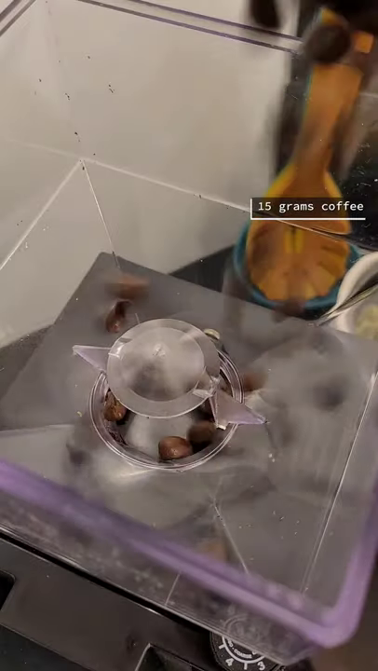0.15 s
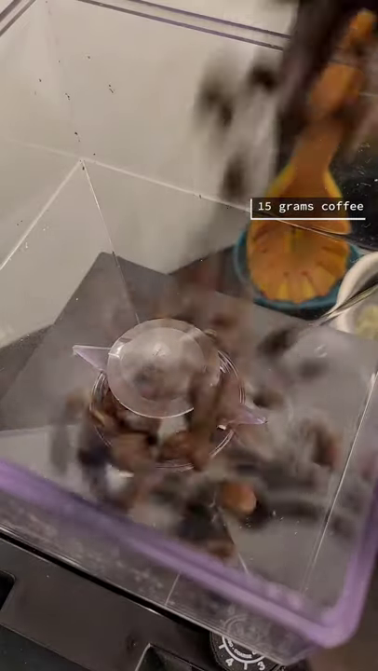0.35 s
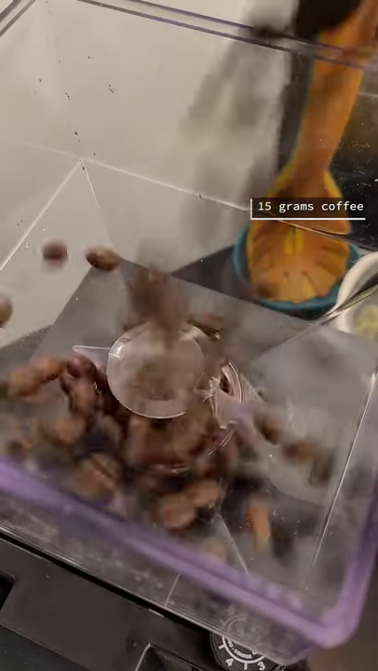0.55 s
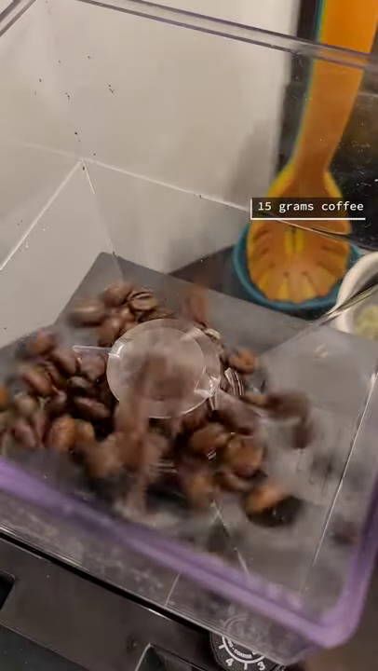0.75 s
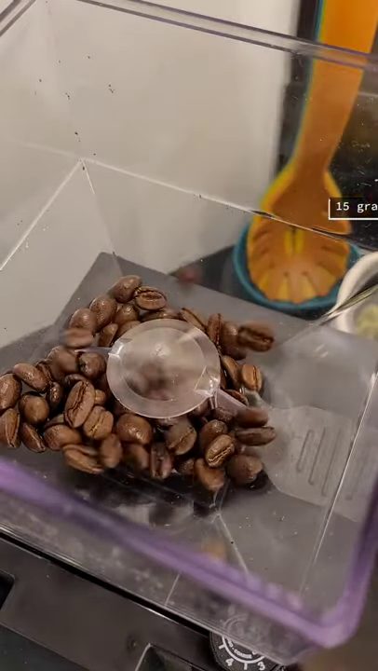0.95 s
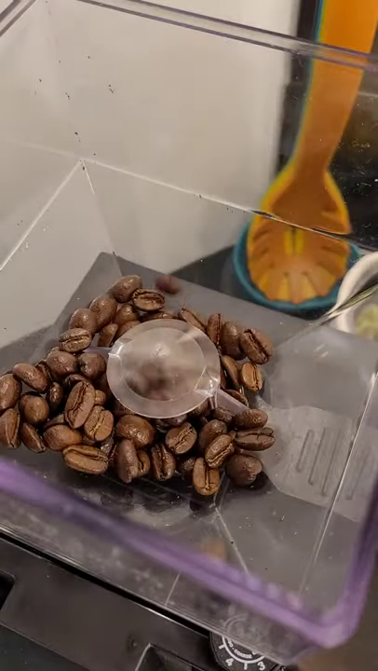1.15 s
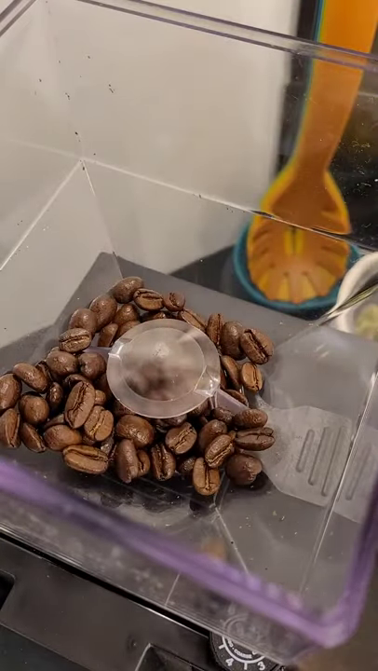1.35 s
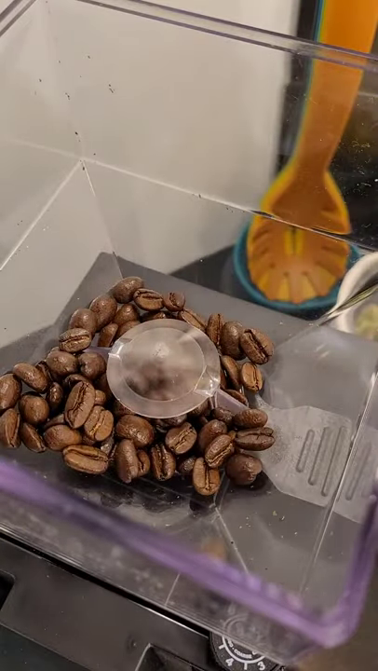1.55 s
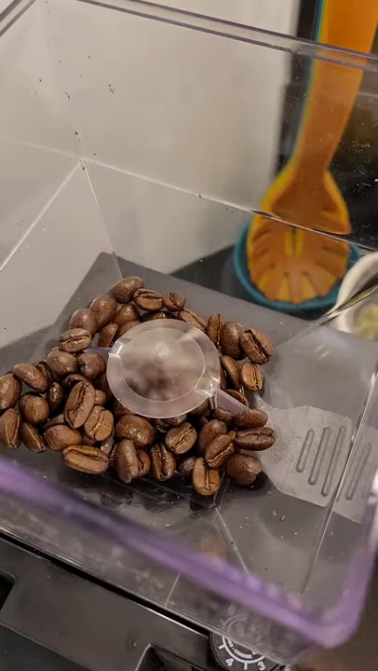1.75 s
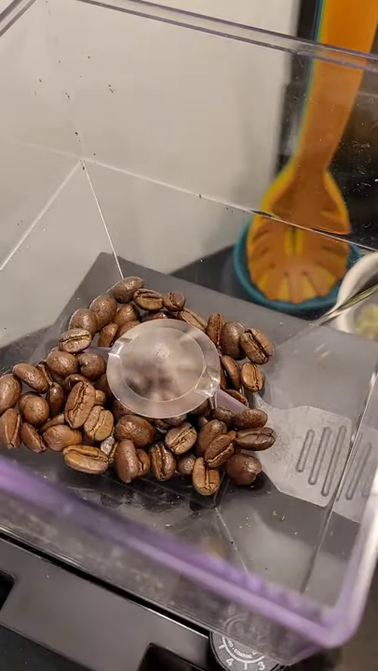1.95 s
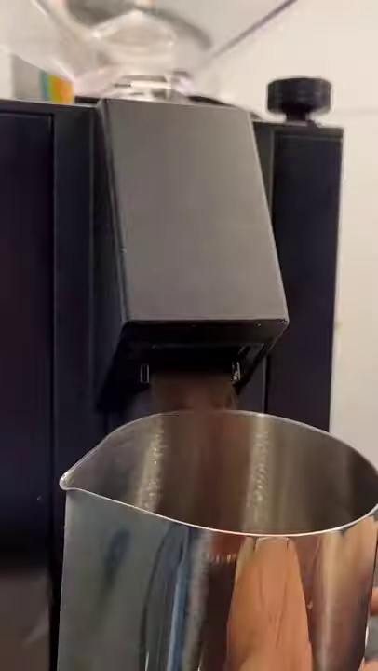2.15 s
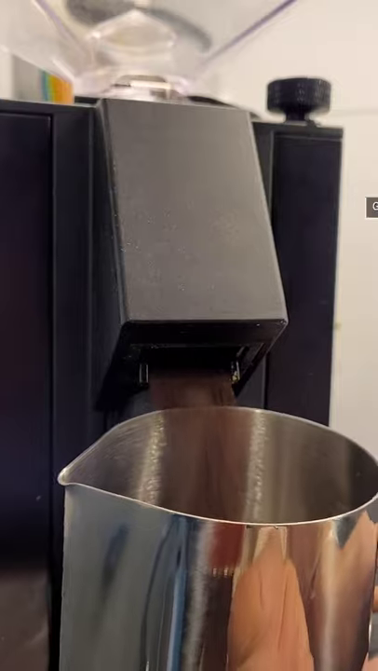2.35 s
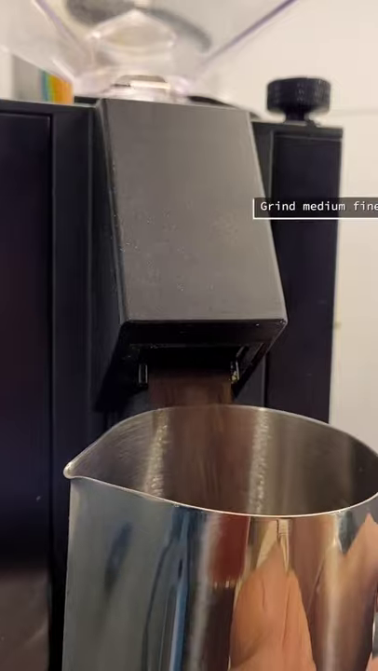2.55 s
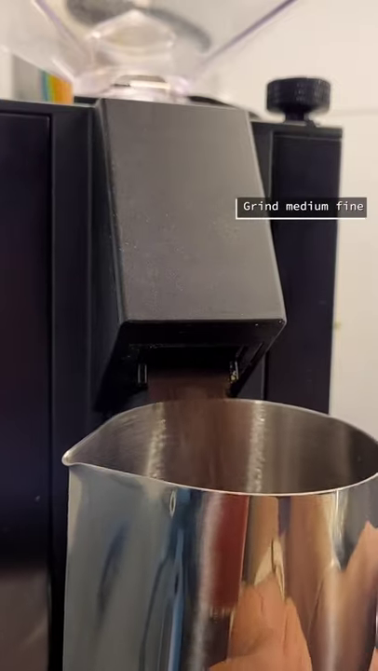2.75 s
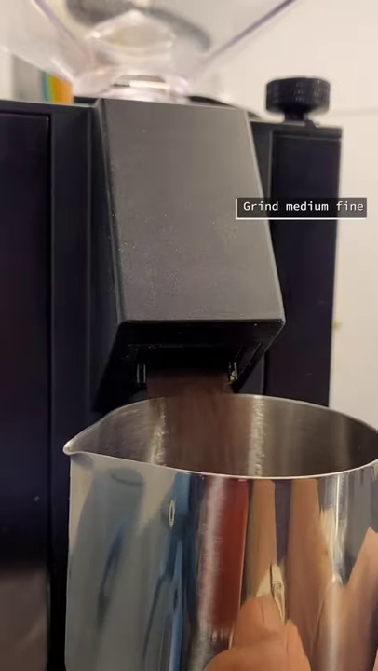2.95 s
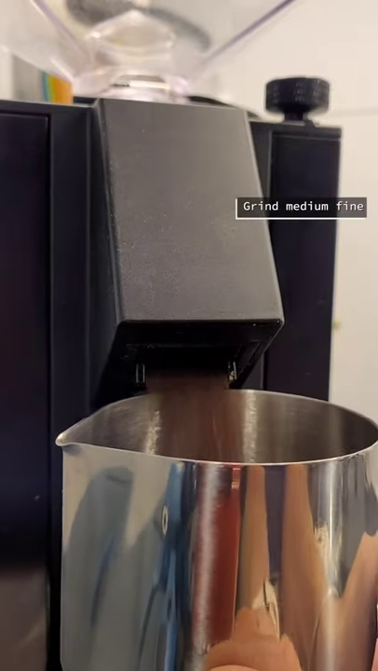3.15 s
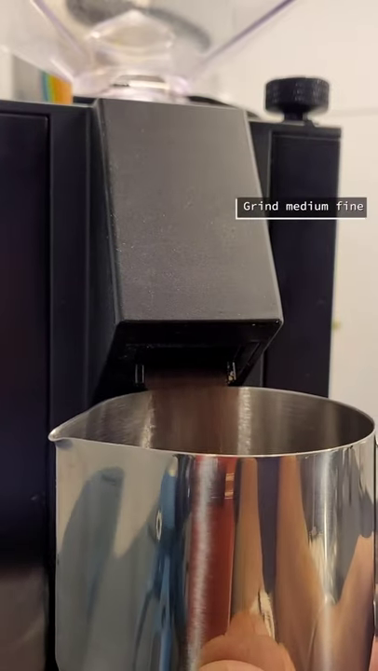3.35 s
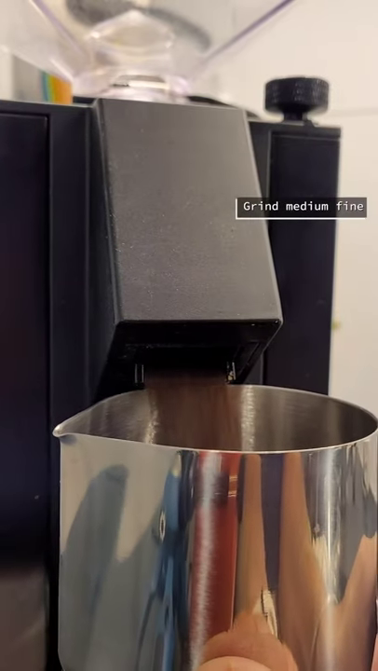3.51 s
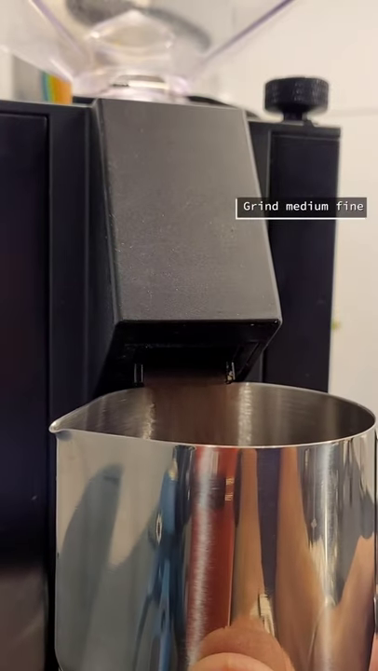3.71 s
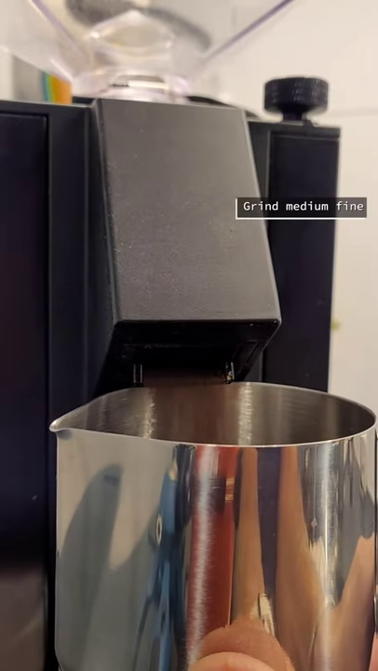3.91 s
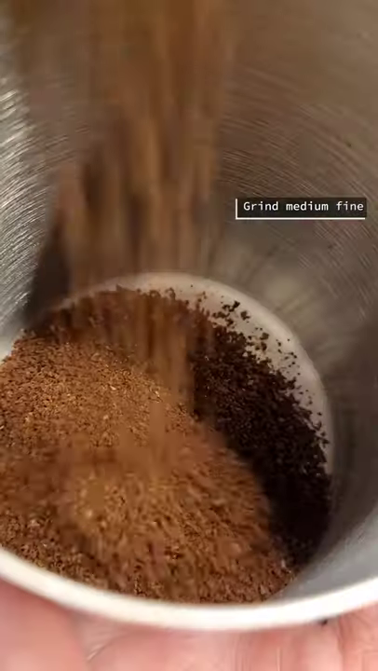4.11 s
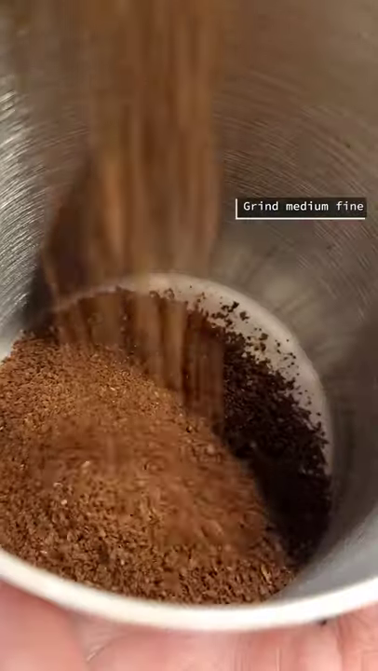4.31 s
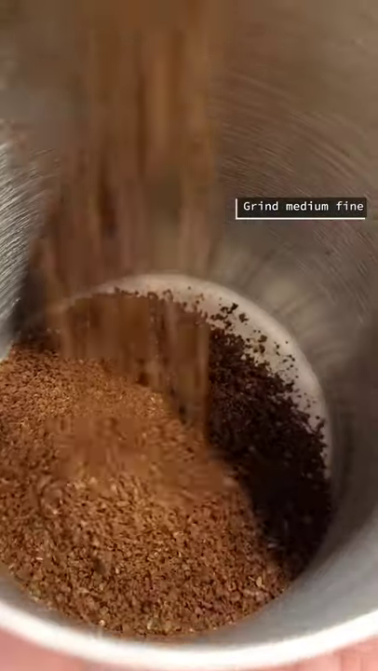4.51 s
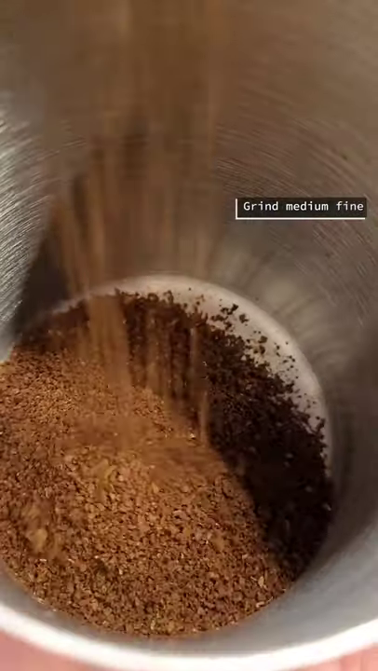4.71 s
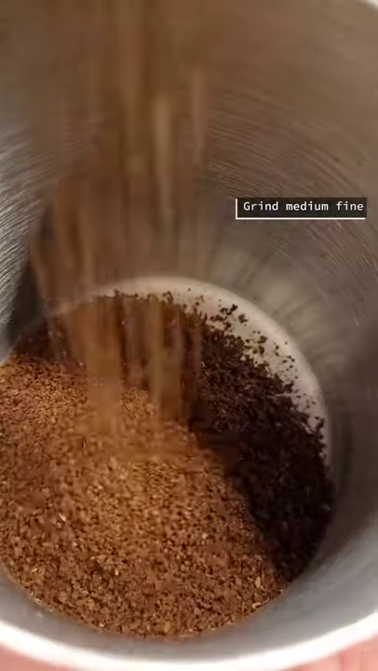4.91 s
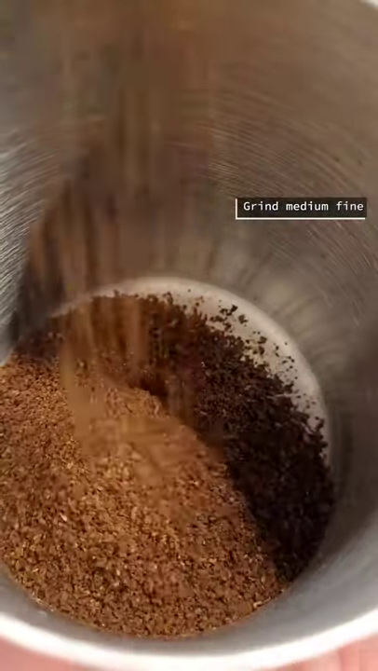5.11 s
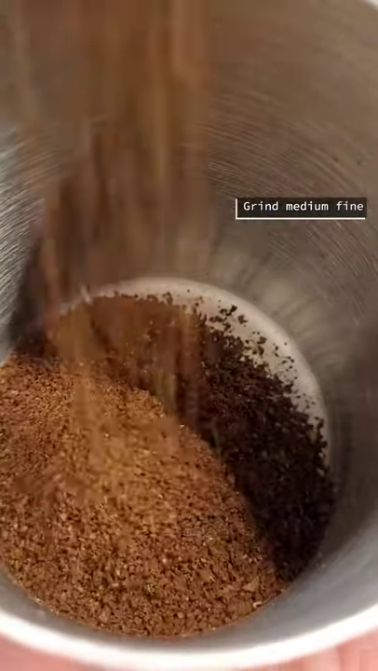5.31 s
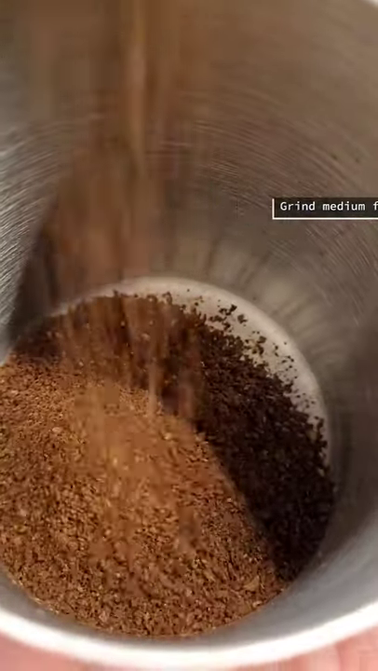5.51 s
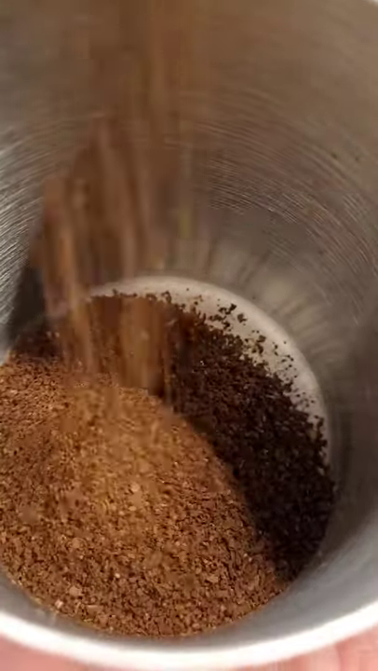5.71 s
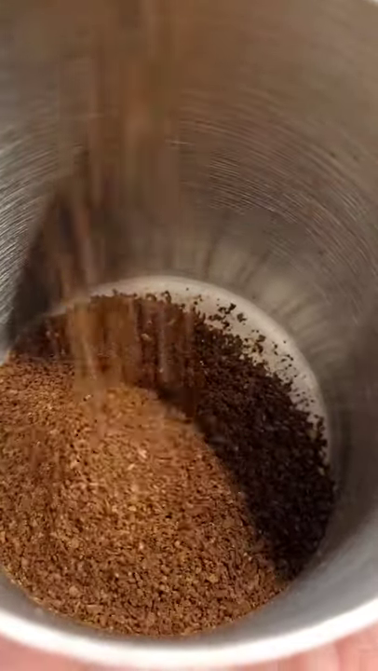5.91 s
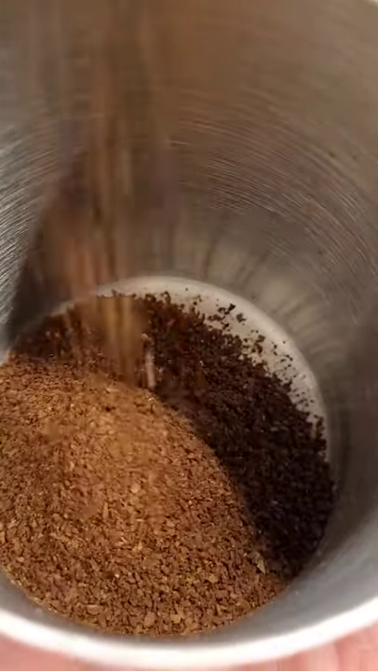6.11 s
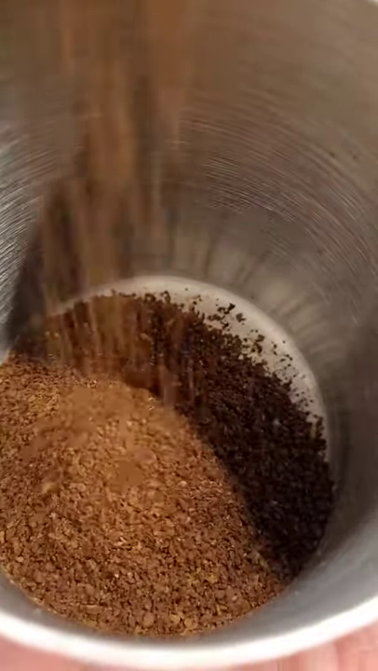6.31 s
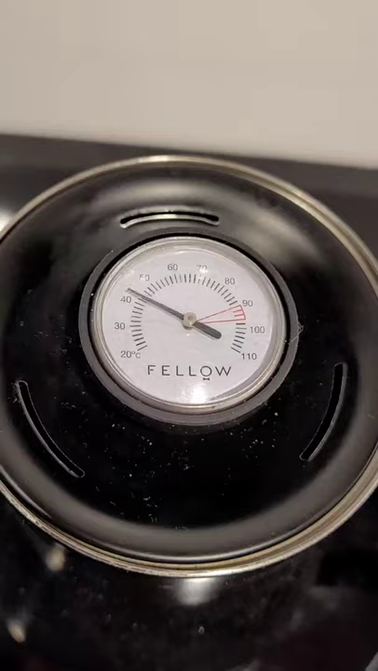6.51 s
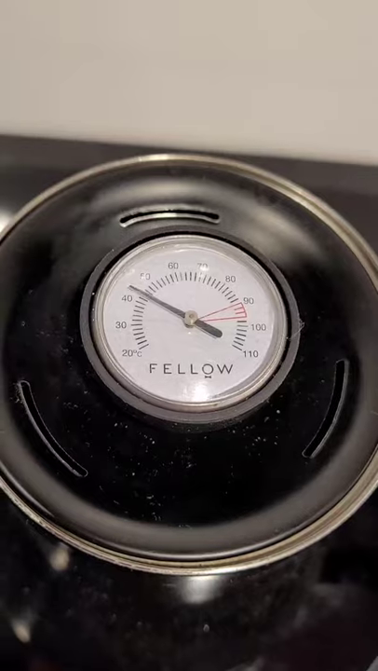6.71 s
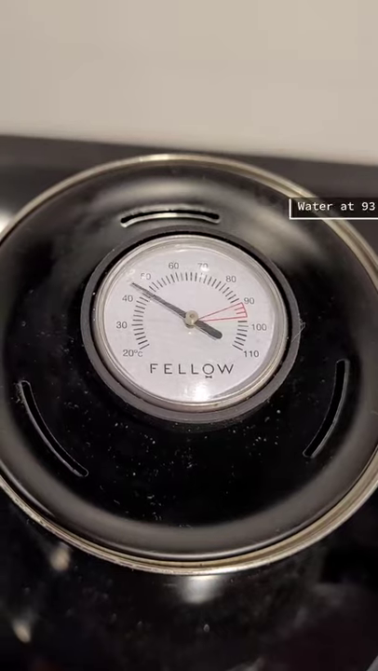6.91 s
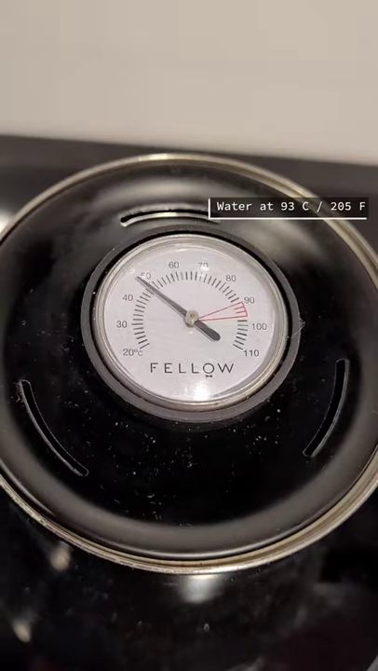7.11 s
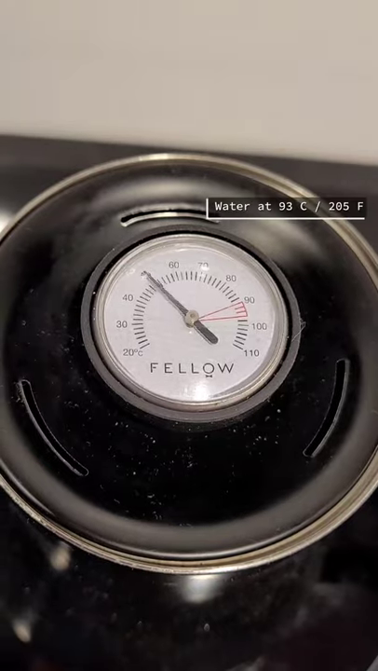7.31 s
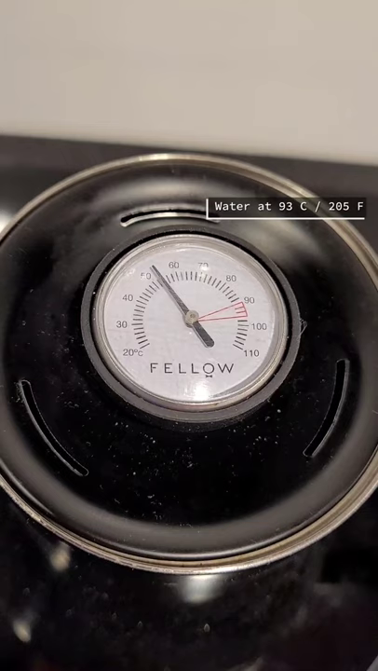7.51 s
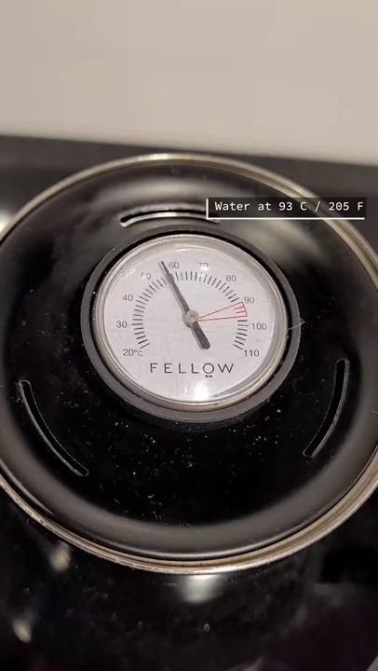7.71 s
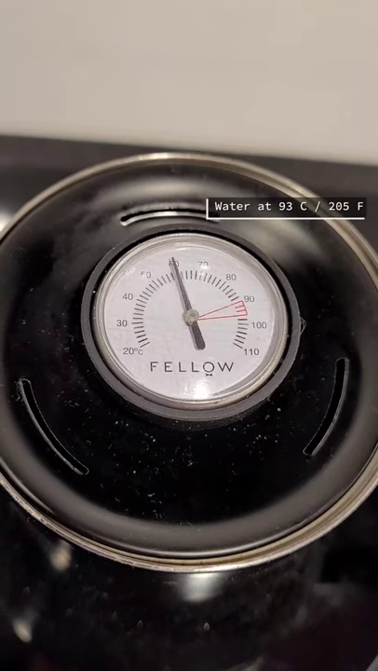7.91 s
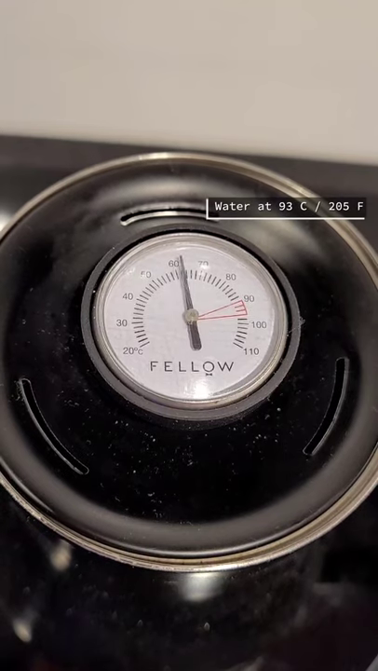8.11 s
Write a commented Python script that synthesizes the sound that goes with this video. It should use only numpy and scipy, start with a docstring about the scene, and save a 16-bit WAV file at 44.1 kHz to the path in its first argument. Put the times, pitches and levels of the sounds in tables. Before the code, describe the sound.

Three close stereo spots follow each other with hard cuts. First, dry beans rattle sharply on hollow plastic, swell and trail off into faint room rumble. Next, a coffee grinder runs with a rough low buzz and gritty crunching, then sounds more metallic over a jug as the beans run low and crack singly. Last, a much quieter kettle heats, fizzing finely over a low murmur.

```python
"""In a kitchen, making coffee, from three spots one after another: grinder hopper, grinder outlet, kettle.
Beans pour into the plastic hopper as random contacts ringing its resonances; the last few bounce to rest.
The grinder growls at its tooth rate and crunches, close to its chute, then from above the steel jug as
the beans run low. Last, water heats in a kettle: tiny steam bubbles, short rings, snap over a low simmer
of filtered noise."""
import sys
import numpy as np
from scipy import signal
from scipy.fft import rfft, irfft, next_fast_len
from scipy.io import wavfile
from scipy.ndimage import uniform_filter1d

SR = 44100
rng = np.random.default_rng(int(sys.argv[2]) if len(sys.argv) > 2 else 0)


def file_out(sig):
    """Save sig as 16-bit WAV at sys.argv[1]."""
    # one column per channel
    cols = np.atleast_2d(sig).T
    # limit, then scale
    lim = np.clip(cols, -1, 1)
    pcm = np.round(lim * 32767).astype(np.int16)
    wavfile.write(sys.argv[1], SR, pcm)


N = 359415
T = np.arange(N) / SR  # time [s]

# where the chute, the jug and the kettle begin: time [s]
CUTS = [2.092, 4.105, 6.493]


def amp(db):
    """Decibels to gain."""
    return 10 ** (np.asarray(db) / 20)


def unit(x):
    """Scales to an rms of one."""
    return x / np.sqrt(np.mean(x ** 2) + 1e-20)


def levelled(x):
    """Scales a stereo pair so that its middle has an rms of one."""
    return x / np.sqrt(np.mean(x.mean(0) ** 2) + 1e-20)


def curve(rows, axis=1):
    """One column of a table, joined by straight lines in time."""
    rows = np.array(rows)
    return np.interp(T, rows[:, 0], rows[:, axis])


def read(points, hz):
    """A spectrum, joined by straight lines over log frequency."""
    f, value = np.transpose(points)
    return np.interp(np.log(hz + 1), np.log(f + 1), value)


def add(mix, s, sound):
    """Mixes a sound in at time s."""
    part = mix[..., max(round(s * SR), 0):][..., :sound.shape[-1]]
    part += sound[..., :part.shape[-1]]


def shot(start, end):
    """One between two times, zero elsewhere, with edges softened over 100 samples."""
    inside = (T >= start) & (T < end)
    return uniform_filter1d(inside * 1., size=100)


def wander(hz):
    """Slow random motion of rms one, its spectrum a bell that falls to 1/e at the given rate."""
    f = np.arange(0, 3 * hz, SR / N)
    spectrum = rng.standard_normal((len(f), 2)) @ [1, 1j] * np.exp(-(f / hz) ** 2)
    return unit(irfft(spectrum, next_fast_len(N, True))[:N])


def clicks(per_s, spread_db):
    """A random train of clicks, many small and a few large."""
    size = amp(spread_db * np.minimum(rng.exponential(1, N), 4))
    return size * rng.choice([-1, 1], N) * (rng.random(N) < per_s / SR)


def ping(hz, cycles, size=3000):
    """A short ring of a few cycles: a collapsing bubble or a knocked wall."""
    age = np.arange(size) / SR * hz  # in cycles
    ring = np.sin(2 * np.pi * age) * age * np.exp(-age / cycles)
    return ring / abs(ring).max()


def body(spectrum, modes=(), pan=((1, 0), (2, 0)), detune=0, lag_s=0, size=8192):
    """Causal stereo response of a body; resonances shift from spot to spot, the right lags (left if negative)."""
    hz = np.fft.rfftfreq(size, 1 / SR)
    lift = 0
    for f, width, db in modes:
        f = f * (1 + detune * rng.standard_normal())
        lift = lift + (amp(db) ** 2 - 1) / (1 + (2 * (hz - f) / width) ** 2) ** 1.5
    db = read(spectrum, hz) + read(pan, hz) * np.array([[.5], [-.5]])
    # folding the cepstrum forward gives minimum phase: each resonance rings only after its strike
    cepstrum = irfft(np.log(amp(db) * np.sqrt(np.maximum(1 + lift, .1))))
    cepstrum[:, 1:size // 2] *= 2
    cepstrum[:, size // 2 + 1:] = 0
    delay = np.maximum([[-lag_s], [lag_s]], 0)
    return irfft(np.exp(rfft(cepstrum) - 2j * np.pi * hz * delay))[:, :size // 2]


def through(x, response):
    """Passes a sound through a left and right response."""
    return signal.oaconvolve(np.atleast_2d(x), response, axes=1)[:, :x.shape[-1]]


def knock(crack_s, ring_s, ring_db, near_db, tint_db=0, size=5000, count=14):
    """One hard contact of random colour: a crack, stronger on the nearer side, and scatter between close walls."""
    # the two microphones hear the bass alike and the treble less so: (frequency [Hz], likeness [0 to 1])
    likeness = [(350, 0.85), (1200, 0.32), (8000, .15)]
    t, hz = np.arange(size) / SR, np.fft.rfftfreq(size, 1 / SR)
    crack = np.exp(-t / crack_s) * amp([[near_db / 2], [-near_db / 2]])
    scatter = amp(ring_db) * np.exp(-t / ring_s)
    steps = rng.uniform(-1.03, 1, count)
    tint = unit(amp(tint_db * np.interp(np.sqrt(hz / hz[-1]), np.linspace(0, 1, count), steps)))
    alike = np.clip(read(likeness, hz), -1, 1)
    shares = np.sqrt([(1 + alike) / 2, (1 - alike) / 2])
    mid, side = rfft(rng.standard_normal((2, size))) * tint * shares
    return irfft(np.array([mid + side, mid - side]), size) * (crack + scatter)


def strikes(rows, spot, **contact):
    """Plays a table of contacts, each on a new spot of one body, the peak of its middle at the given level."""
    out = np.zeros((2, N))
    for s, db in rows:
        hit = through(knock(**contact), spot())
        add(out, s, amp(db) * hit / abs(hit.mean(0)).max())
    return out


def shower(spot, per_s, spread_db, count=12, **contact):
    """Many random contacts at several spots of one body; the busiest spot keeps changing, and the colour too."""
    roam_db, roam_hz = 2, 15  # how strongly (rms) and how fast each spot comes and goes
    total = np.zeros((2, N))
    for _ in range(count):
        train = clicks(per_s / count, spread_db) * amp(roam_db * wander(roam_hz))
        total += through(train, through(knock(**contact), spot()))
    return levelled(total)


def room(x, t60):
    """The faint diffuse tail of the kitchen: noise that dies by 60 dB in t60 seconds."""
    t = np.arange(SR // 2) / SR
    tail = rng.standard_normal((2, len(t))) * np.exp(-np.log(1000) * t / t60)
    return through(x, tail / np.linalg.norm(tail[0]))


def kitchen():
    """Low room noise, shaped from white noise and swelling with a few soft bumps."""
    # spectrum of the room air: (frequency [Hz], level [dB])
    air_colour = [(18, -29.5), (35, -13.5), (81, -22), (151, -6.5), (185, -35.5), (344, -17), (714, -42.5),
                  (6000, -64), (13200, -120)]
    # soft low bumps in the room: (time [s], half length to 1/e [s], level [dB])
    soft_bumps = [(1.024, 0.077, -57), (1.293, 0.049, -65), (1.732, 0.047, -59)]
    air_db = -71
    air = levelled(through(rng.standard_normal(N), body(air_colour)))
    swell = sum(amp(db) * np.exp(-((T - s) / width) ** 2) for s, width, db in soft_bumps)
    rumble_colour = [(40, -4.5), (120, 3.5), (220, -31.5), (900, -58)]  # (frequency [Hz], level [dB])
    rumble = levelled(through(rng.standard_normal(N), body(rumble_colour)))
    return amp(air_db) * air + swell * rumble


def pour():
    """Strength of the stream of beans: one swell as the cup tips and empties."""
    peak_s, peak_db, swell_s, ebb_s, flatness = 0.66, -21.5, 0.66, 0.24, 2.13
    width = np.where(T < peak_s, swell_s, ebb_s)
    return amp(peak_db) * np.exp(-abs((T - peak_s) / width) ** flatness)


def beans():
    """Beans crack against the plastic and each other; the hopper rings, knocks and thumps."""
    # beans that stand out, and the last ones bouncing, before the pile dulls their lows: (time [s], peak level [dB])
    lone_beans = [(0.0054, -7.5), (0.0662, -18), (0.0787, -11), (0.0977, -10.5), (0.1371, -8), (0.161, -24),
                  (0.1825, -10.5), (0.2254, -12), (0.2359, -9), (0.2598, -8), (0.2962, -14.5),
                  (0.3277, -22), (0.3745, -8.5), (0.4179, -13.5), (0.5322, -16), (0.5781, -7.5),
                  (0.6779, -12.5), (0.7243, -7.5), (0.7597, -10), (0.8215, -13), (0.8654, -5),
                  (0.9108, -7.5), (0.9303, -14.5), (0.9702, -20), (1.0101, -21), (1.063, -17),
                  (1.1704, -32), (1.1802, -26.5), (1.2501, -31.5), (1.277, -42), (1.3149, -40)]
    # low thumps of the hopper under the stream: (time [s], peak level [dB])
    hopper_thumps = [(.005, -40), (.16, -42), (.275, -36.5), (.535, -37.5), (.675, -37), (.735, -42),
                     (.865, -36.5), (.912, -42.5)]
    # spectrum of a thump: (frequency [Hz], level [dB])
    thump_colour = [(20, -21.5), (60, 4), (140, -10), (300, -11.5), (1200, -43)]
    # hollow knocks of the hopper wall: (time [s], level of each tone [dB])
    wall_knocks = [(.197, -46.5), (.246, -45.5), (.471, -42.5)]
    # tones of the hopper wall: frequency [Hz]
    wall_hz = [695, 937]
    # spectrum of the plastic hopper: (frequency [Hz], level [dB])
    hopper_colour = [(100, -18.5), (450, -24), (750, -14.5), (1100, -22.5), (1600, -12), (2200, -2),
                     (3000, -6.5), (3900, -4), (4700, 1.5), (5900, -3), (7600, 5.5), (8700, -4.5),
                     (11700, 2.5), (15500, -3.5)]
    # its resonances: (frequency [Hz], width [Hz], lift [dB])
    hopper_modes = [(363, 39, 10), (573, 19, 17.5), (1923, 85, 14.5), (3306, 48, 13.2), (3990, 130, -13),
                    (4207, 34, 13), (4740, 120, 5.2)]
    # its balance between the microphones: (frequency [Hz], left minus right [dB])
    hopper_pan = [(250, 7), (1300, 0.5), (2500, 2.5), (6500, 1), (10000, 6.5)]
    wall_cycles = 6.1  # decay to 1/e, in cycles
    pile_full_s, pile_hz = 1.3, 2620
    clump_db, clump_hz = 1.07, 60  # the stream tumbles in clumps

    def hopper():
        """A fresh spot on the hopper."""
        return body(hopper_colour, hopper_modes, hopper_pan, detune=.011, lag_s=.00022)

    hits = strikes(lone_beans, hopper, crack_s=.0023, ring_s=0.014, ring_db=-4.5, near_db=4, tint_db=7)
    # once a pile covers the floor, beans land on beans and the low ring of the plastic fades
    on_pile = np.minimum(T / pile_full_s, 1) ** 2
    without_lows = signal.lfilter(*signal.butter(1, pile_hz, "high", fs=SR), hits)
    hits += on_pile * (without_lows - hits)
    contacts = shower(hopper, per_s=400, spread_db=1.0, crack_s=.0016, ring_s=0.009, ring_db=-7,
                      near_db=5.5, tint_db=4.5)
    stream = pour() * amp(clump_db * wander(clump_hz)) * contacts
    thumps = strikes(hopper_thumps, lambda: body(thump_colour), crack_s=.0098, ring_s=0.029,
                     ring_db=-24.0, near_db=21)
    rattle = hits + stream
    for s, db in wall_knocks:
        add(rattle, s, amp(db) * sum(ping(hz, wall_cycles) for hz in wall_hz))
    return rattle + amp(-32.5) * room(rattle, t60=0.87) + thumps


def supply():
    """How well the burrs are fed, in dB: full, then dwindling once the hopper runs low."""
    runs_low_s, dwindle_s, empty_db = 5.464, 0.49, -9.5
    return empty_db * (1 - np.exp(-np.maximum(T - runs_low_s, 0) / dwindle_s))


def bites(axis):
    """Strength of the growl (axis 2) or crunch (axis 3) as each bean is seized, held and let go."""
    # the burrs labour through a whole bean: (start [s], length [s], growl level [dB], crunch level [dB])
    seized_beans = [(2.16, 0.11, -42, -44), (2.313, 0.098, -43.5, -44.5), (2.526, 0.21, -39, -57),
                    (3.012, 0.034, -38, -54), (3.182, 0.066, -37, -54), (3.344, 0.3, -42, -46),
                    (3.714, 0.16, -45.5, -67), (4.03, 0.062, -41, -45), (4.876, 0.117, -62, -42.5),
                    (5.226, 0.074, -46, -41), (5.669, 0.04, -59, -39.5), (5.818, 0.045, -69, -38.5),
                    (5.937, 0.044, -60, -40.5), (6, 0.11, -57, -43), (6.238, 0.06, -49, -40.5),
                    (6.45, 0.056, -56, -44.5)]
    attack_s, release_s = 0.0094, 0.0099
    out = np.zeros(N)
    for row in seized_beans:
        start, length = row[:2]
        t = np.arange(0, length + 8 * release_s, 1 / SR)
        grip = np.minimum(t / attack_s, 1) * np.exp(-np.maximum(t - length, 0) / release_s)
        add(out, start, amp(row[axis]) * grip)
    return out


def growl():
    """The burr teeth cut about 300 times a second: ragged on fragments, strong and steadier on a whole bean."""
    # motor speed, sagging under the first full load: (time [s], cutting rate [Hz])
    motor_speed = [(2.09, 303.6), (2.58, 292.5), (3.04, 284.9), (3.24, 304.6), (6.49, 287)]
    ragged_share = 0.62  # scales the two feed levels below
    chute_db, jug_db, follows_supply = -45.5, -50.5, 0.67
    turns = np.cumsum(curve(motor_speed) * (1 + 0.0148 * wander(49.3))) / SR
    phase = 2 * np.pi * turns
    at_chute = T < CUTS[1]
    fed = ragged_share * amp(np.where(at_chute, chute_db, jug_db) + follows_supply * supply())
    steady = np.hypot(fed, bites(axis=2))
    ragged = fed * (wander(32) * np.cos(phase) + wander(23.0) * np.sin(phase))
    first = steady * (1 + 0.19 * wander(33)) * np.cos(phase) + ragged
    second = steady * np.cos(2 * phase)
    overtone = np.where(at_chute, amp([[-22], [-6]]), amp([[-7], [-10]]))  # left, right
    return first + overtone * second


def grinder():
    """Bean fragments shatter between the burrs and ring the housing and the jug."""
    # single beans cracking between the burrs: (time [s], peak level [dB])
    bean_cracks = [(2.3129, -28), (2.7898, -37), (3.2642, -30), (3.4338, -34), (3.5341, -30), (3.8344, -31),
                   (5.2572, -28), (5.4947, -32), (5.7511, -33), (5.893, -29), (5.9461, -29),
                   (6.3622, -32.5)]
    # spectra close to the chute and above the jug: (frequency [Hz], level [dB])
    chute_colour = [(30, -25), (130, -19.5), (350, -5.5), (480, -12.5), (920, -9.5), (1250, 4.5), (1650, 1),
                    (2650, -13.5), (3300, -6), (3800, -11.5), (5200, -13), (8500, -25.5), (11000, -22.5)]
    jug_colour = [(30, -31), (100, -12), (200, -18), (350, -7), (480, -13.5), (920, -11.5), (1120, 2.5),
                  (1500, -2), (2450, -3.5), (2700, -12), (3300, -8.5), (4000, -13), (5100, -10.5),
                  (8700, -28.5), (11000, -20.5)]
    # their resonances: (frequency [Hz], width [Hz], lift [dB])
    chute_modes = [(2303, 57, 10.8), (2890, 43, 10.4), (5080, 150, 7), (7290, 550, 8.9)]
    jug_modes = [(1293, 45, 7.3), (1580, 54, 9), (1880, 20, 12.5), (2281, 37, 12.6), (2930, 125, 7.9),
                 (3287, 90, 8.6), (7270, 520, 9.2), (10450, 120, 6.5)]
    # their balance between the microphones: (frequency [Hz], left minus right [dB])
    chute_pan = [(200, -1.5), (700, -8.5), (2000, 2), (7200, -2.5), (8500, 0.5)]
    jug_pan = [(1500, 1.5), (3200, 9.9), (4400, 0.89), (8500, 6.4)]
    crunch_db, surge_db, surge_hz = -39, 0.14, 29  # the crunch comes in slight surges

    def chute():
        """A fresh spot at the chute."""
        return body(chute_colour, chute_modes, chute_pan, detune=0.01, lag_s=-0.000356)

    def jug():
        """A fresh spot at the steel jug."""
        return body(jug_colour, jug_modes, jug_pan, detune=0.004, lag_s=0.000451)

    feed = np.hypot(amp(crunch_db + supply()), bites(axis=3)) * amp(surge_db * wander(surge_hz))
    out = growl() * shot(CUTS[0], CUTS[2])
    for housing, start, end in zip([chute, jug], CUTS, CUTS[1:]):
        crunch = feed * shower(housing, per_s=950, spread_db=1.0, crack_s=0.00056, ring_s=0.012,
                               ring_db=1.5, near_db=5.5, tint_db=5.5)
        cracks = strikes(bean_cracks, housing, crack_s=.003, ring_s=.019, ring_db=2, near_db=-2, tint_db=5)
        out += (crunch + cracks) * shot(start, end)
    return out


def kettle(count=30):
    """Bubbles of all sizes snap on the hot base, over the murmur of the vessel."""
    # spectrum of the simmer: (frequency [Hz], level [dB])
    simmer_colour = [(18, -54), (30, -12), (87, -10), (146, 4), (198, -5), (309, -2.5), (540, -10),
                     (694, -4), (841, -13.5), (6600, -40)]
    # spectrum of the fizz: (frequency [Hz], level [dB])
    fizz_colour = [(500, -40), (2000, 0), (4500, -4.5), (7500, -1.5)]
    # the loudest steam bubbles: (time [s], peak level [dB], pitch [Hz])
    loud_bubbles = [(6.601, -35.5, 1880), (6.658, -41.5, 1430), (6.8116, -44, 1600), (6.866, -22.5, 11500),
                    (6.898, -38.5, 1370), (6.938, -38.5, 1220), (7.069, -23.5, 9750), (7.104, -26, 8800),
                    (7.287, -27.5, 7400), (7.345, -35.5, 1540), (7.402, -23.5, 11400), (7.748, -42, 1150)]
    simmer_db = -49.5
    fizz_db, fizz_fall_db_per_s = -47.5, 1.7  # the fizz slowly softens as the water warms
    swarm = np.zeros(N)
    for hz in np.geomspace(4500, 16000, count):
        snaps = clicks(per_s=42 * hz / 8000, spread_db=4.6)
        bubble = ping(hz, rng.uniform(0.4, 0.9), size=200)
        swarm += signal.oaconvolve(snaps, bubble)[:N] * np.sqrt(hz)
    hiss = 0.42 * rng.standard_normal(N)
    fizz = levelled(through(unit(swarm) + hiss, body(fizz_colour)))
    simmer = levelled(through(rng.standard_normal(N), body(simmer_colour)))
    simmer = simmer * amp(1.4 * wander(28))  # its level flickers
    out = amp(fizz_db - fizz_fall_db_per_s * (T - CUTS[2])) * fizz + amp(simmer_db) * simmer
    for s, db, hz in loud_bubbles:
        add(out, s, amp(db) * ping(hz, cycles=0.78))
    return out


def scene():
    """The hopper in its kitchen, then the grinder, then the kettle."""
    hopper_shot = (beans() + kitchen()) * shot(0, CUTS[0])
    return hopper_shot + grinder() + kettle() * shot(CUTS[2], np.inf)


def record(dry):
    """The band limit of the recorder: a steep low-pass."""
    edge_hz = 15900
    lowpass = signal.firwin(511, edge_hz, window=("kaiser", 8), fs=SR)
    return signal.oaconvolve(dry, lowpass[None], "same")


dry = scene()
out = record(dry)
file_out(out)
```